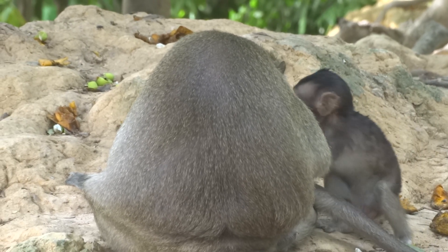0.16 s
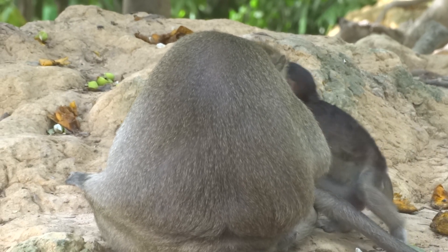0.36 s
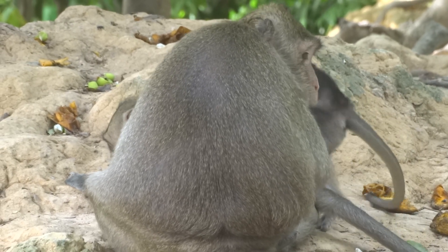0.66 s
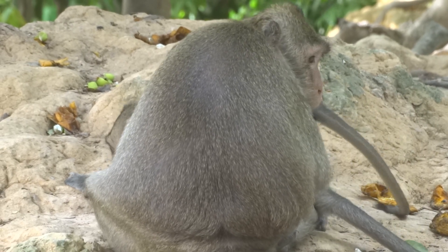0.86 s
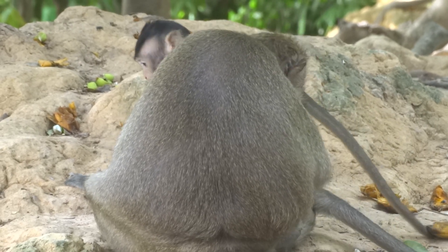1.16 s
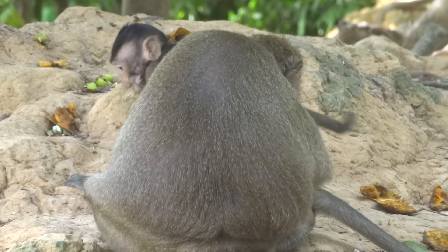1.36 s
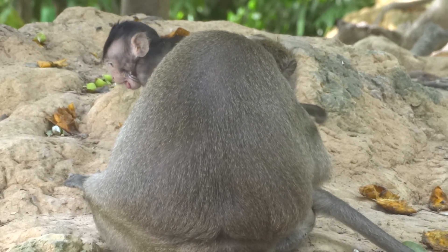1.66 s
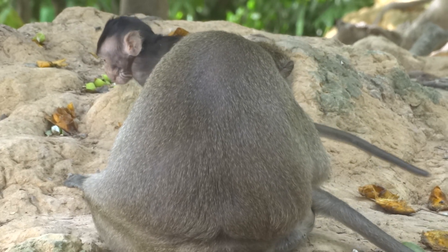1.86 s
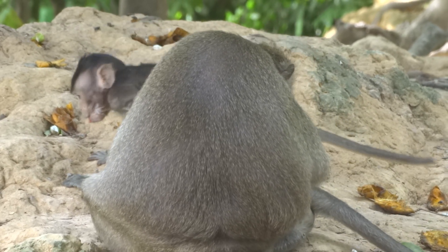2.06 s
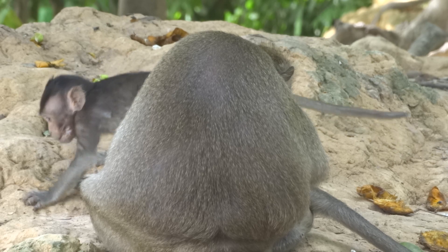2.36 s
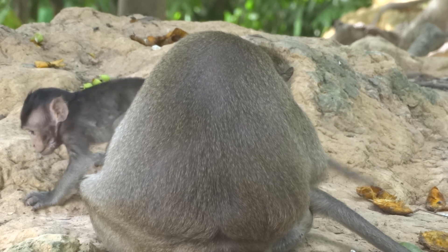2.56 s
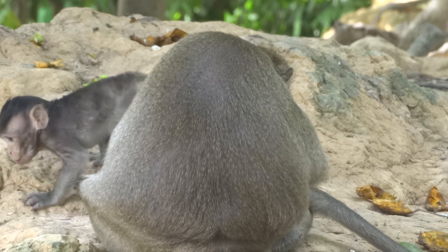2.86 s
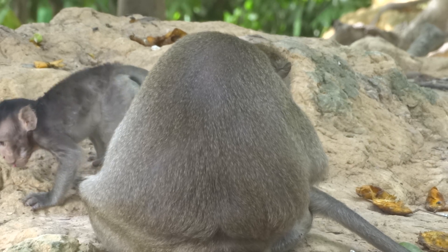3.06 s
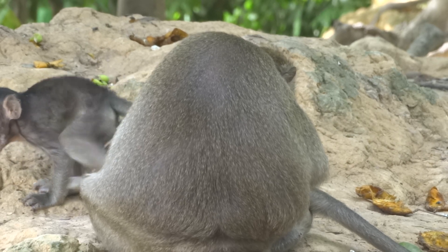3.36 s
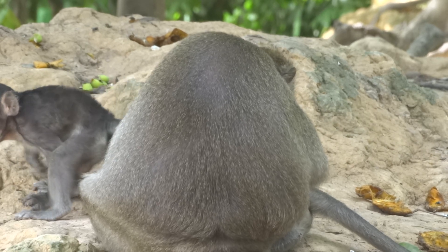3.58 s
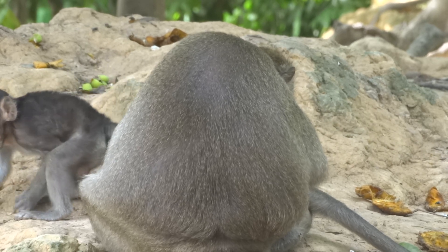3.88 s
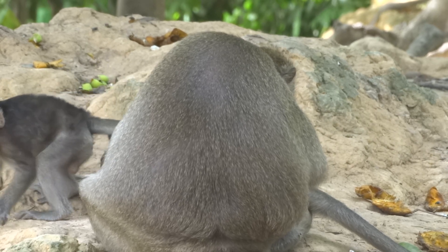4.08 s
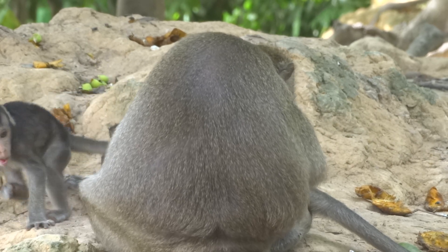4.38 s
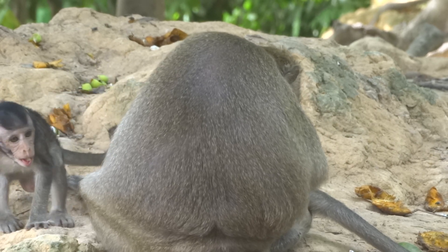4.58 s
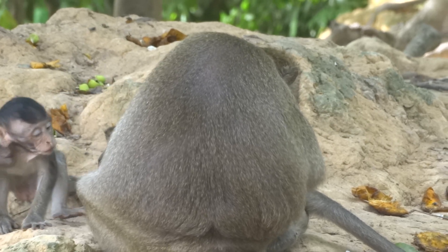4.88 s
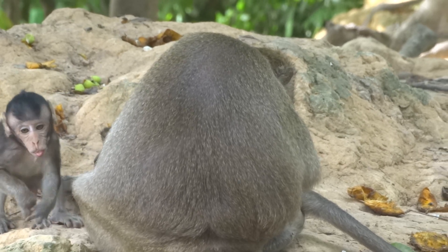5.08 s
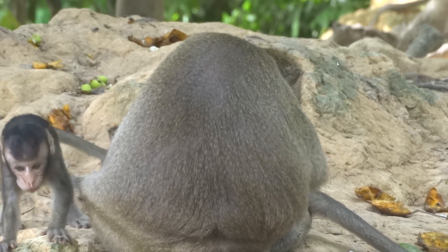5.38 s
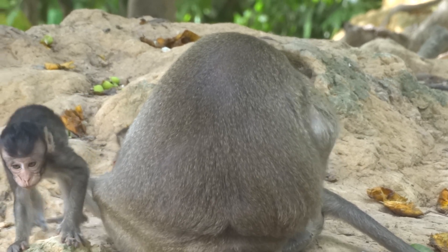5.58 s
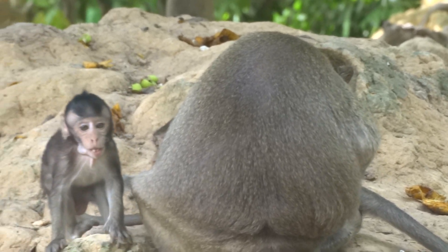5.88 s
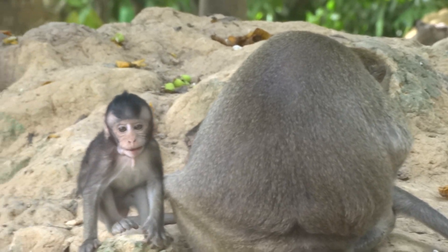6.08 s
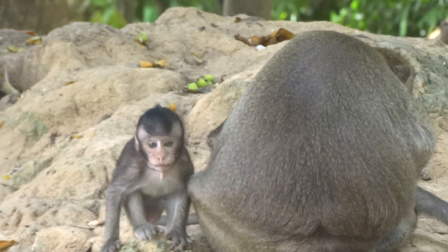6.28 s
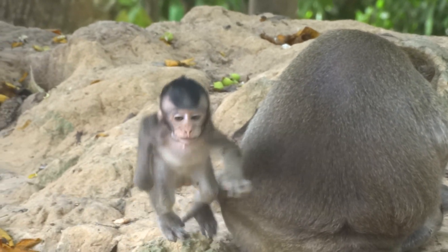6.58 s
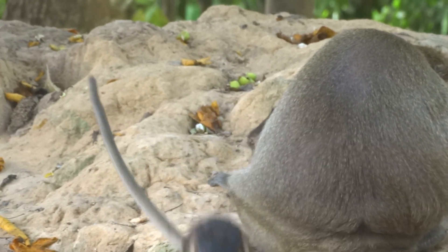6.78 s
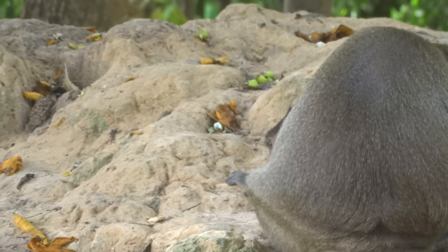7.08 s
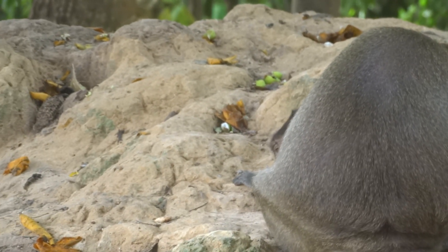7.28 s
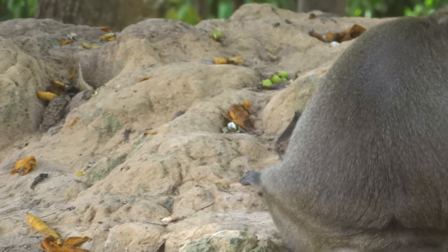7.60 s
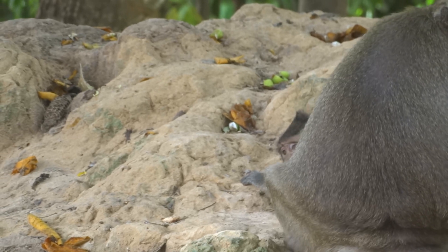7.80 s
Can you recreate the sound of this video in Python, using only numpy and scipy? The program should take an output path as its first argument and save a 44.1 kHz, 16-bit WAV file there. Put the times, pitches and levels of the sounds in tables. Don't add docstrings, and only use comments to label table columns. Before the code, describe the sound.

Outdoors, a clattery rush of three puttering small motorbikes rises from quiet, passes toward the right, dips, then swells loudest near the end.

```python
import sys
import numpy as np
from scipy import signal
from scipy.fft import rfft, irfft, next_fast_len
from scipy.io import wavfile
from scipy.ndimage import uniform_filter1d

SR = 44100
rng = np.random.default_rng(int(sys.argv[2]) if len(sys.argv) > 2 else 0)


def gain_from_db(level_db):
    decades = np.asarray(level_db, float) / 20
    return 10 ** decades


def store_wav(level_fs):
    pcm = np.round(np.clip(np.atleast_2d(level_fs), -1, 1) * 32767)
    wavfile.write(sys.argv[1], SR, pcm.T.astype(np.int16))


N = 350154

# time in seconds, firings per second.
FIRING_RATES = [
    [(0, 23.61), (1, 23.816), (2.5, 24.571), (4.5, 24.515), (5, 25.116), (6, 25.133), (7.94, 26.341)],
    [(0, 18.387), (3, 18.425), (4, 18.819), (6, 18.846), (7.94, 19.711)],
    [(0, 31.93), (4.5, 32.853), (5.5, 33.634), (6, 34.448), (7, 35.275), (7.94, 35.097)],
]
# frequency in Hz, level in dB.
PIPE_RESPONSES = [
    [(20, -70), (49, -23), (74, -22), (98, -12), (147, -2.5), (190, -7), (265, 1.5), (320, -5.5),
     (370, -25), (500, -6.5), (900, -33), (5000, -103)],
    [(15, -87), (56, -37), (75, -14), (94, -4), (150, 0), (188, -8), (245, -7), (300, -7.5), (380, -12),
     (500, -11.5), (900, -36), (5000, -102)],
    [(25, -84), (45, -40), (70, -19), (105, -13), (176, 3.5), (211, 0.5), (245, -3.5), (315, 2), (352, 7.5),
     (390, -8), (420, -8), (600, -11), (1000, -34), (5000, -91)],
]
START_TURNS = [.944, .276, .588]
# arrival in seconds, stay in seconds, level in dB,
# nearing slope in dB per second, leaving slope in dB per second.
EXHAUST_PASSES = [
    (2.55, 0.83, -55.5, 11, 2),
    (4.1, 1.4, -57, 14, 5.5),
    (7.38, .4, -48, 39, 7),
]
# loudest moment
# in seconds, level in dB, frequency in Hz, rise in Hz per second, fade in dB per second squared.
GEAR_WHINES = [(2.87, -55, 378, 9, 60), (3.68, -60, 292, 0, 200), (3.9, -61, 275, 10, 100),
               (6.95, -58, 211, 1, 40), (3.5, -52, 752, 15, 40), (6.42, -53, 1690, 0, 150),
               (7.06, -44, 1705, 150, 600), (7.6, -47, 1370, 600, 900), (7.2, -52, 603, 0, 100),
               (7.45, -51, 545, -80, 400), (7.45, -56, 635, 0, 100), (7.35, -50, 1880, 60, 800),
               (5.28, -46, 835, 0, 9000), (5.425, -42, 830, 0, 20000), (5.69, -48, 1000, 0, 9000),
               (5.75, -51, 1000, 0, 6000), (6.65, -50, 1090, 0, 600), (3.46, -46, 915, 0, 3000),
               (7.125, -36, 1085, 0, 5000), (7.2, -38, 1085, -100, 2500), (7.04, -41, 1075, 60, 1200),
               (7.3, -40, 1070, 200, 5000), (6.93, -43, 1075, -300, 3000), (7.66, -43, 1420, 0, 6000),
               (5.385, -45, 3080, -4000, 60000), (5.18, -48, 1250, 0, 4000), (5.785, -47, 2540, 0, 30000),
               (7.2, -74, 70, 1, 20)]
# middle in seconds, half length in seconds,
# frequency in Hz, width in Hz, level in dB.
METAL_MODES = [(.9, .4, 745, 25, -63), (1.6, .25, 750, 25, -55), (2.8, .3, 742, 25, -49),
               (3.72, .2, 790, 100, -45), (.9, .45, 1130, 250, -58), (7.2, .1, 1065, 60, -40),
               (6.95, .05, 1020, 130, -43), (7.42, .07, 1105, 70, -42), (7.655, .028, 1400, 160, -37),
               (7.57, .055, 1380, 220, -38.5), (7.05, .07, 1700, 60, -50), (6.75, .045, 2300, 150, -41),
               (6.45, .12, 1690, 60, -56), (7.6, .1, 4600, 40, -51), (3.28, .12, 1950, 350, -44),
               (7.88, .06, 1650, 90, -46), (4.6, .35, 1250, 80, -49)]
# middle in seconds, half length in seconds, frequency in Hz, dB over the rush.
PANEL_RINGS = [(2.16, 0.14, 1460, 7.5), (2.3, .25, 1100, 3.5), (2.33, 0.17, 2020, 6), (2, .15, 2200, 3),
               (1.65, 0.32, 3300, 2), (2.2, 0.23, 2800, 5), (3.8, 0.14, 2100, 2), (9.7, .12, 730, -5),
               (6.75, .15, 540, -6), (2.26, .12, 890, 2.5), (7.65, 0.11, 1030, 2.5),
               (4.84, 0.13, 2150, 2.5), (3.23, .1, 760, 3), (3.1, 0.25, 400, 4), (1.66, .25, 516, 6),
               (0.33, 0.24, 220, 8), (7.58, 0.067, 1550, -2), (2.31, 0.21, 870, 6.5), (2.81, 0.15, 775, 7),
               (3.15, 0.065, 1270, 7), (3.24, 0.11, 2140, 3), (3.14, 0.21, 1850, 5), (2.6, 0.19, 1400, 3),
               (2.96, 0.43, 2190, 2.5), (9.1, 0.05, 980, 8), (3.68, 0.32, 807, 6.5), (3.7, 0.85, 260, 7),
               (4.7, 0.078, 800, 4), (3.43, 0.12, 1710, 4.5), (4.34, .15, 1900, 4), (4.5, .06, 1000, 0.5),
               (5.15, 0.11, 1210, 4.5), (2.95, .12, 1080, 0.5), (2.22, .15, 830, -4), (5.45, 0.06, 260, 12),
               (4.95, 0.21, 930, 4.5), (7.5, 0.04, 6960, 9), (7.25, 0.074, 8200, 3.5), (7.5, 0.16, 7700, 2),
               (6.1, 0.12, 545, 6), (7.598, 0.14, 4700, 4.5)]
# frequency in Hz, width in Hz, dB over the rush.
BODYWORK_MODES = [(1670, 290, 2.5), (2310, 270, 3.5), (3770, 370, 3), (5720, 250, -2.1), (6220, 370, 2.5)]
# arrival in seconds, stay in seconds, level in dB,
# nearing slope in dB per second, leaving slope in dB per second.
CLATTER_PASSES = [
    (1.4, .3, -49.5, 17, 20),
    (2.2, 0.78, -39.5, 14, 3.5),
    (4.4, 1.2, -44.5, 9.5, 14),
    (7.03, .55, -37.5, 10, 7),
]
# time in seconds, rush level in dB, left over right in dB.
RUSH_PATH = [(0, -55, 1.5), (0.99, -50, 0), (1.79, -43.5, -1.7), (2.21, -37, -2.1), (2.61, -35, -3),
             (3.2, -36.5, -4), (4.2, -38.5, -3.5), (5.15, -38, -3), (6.05, -42, -1.7), (6.7, -36.5, -2),
             (7.12, -33, -2.5), (7.5, -33, -4), (7.8, -35.5, -3.5), (7.94, -34.5, -3.5)]
# frequency in Hz, level in dB per Hz.
RUSH_SPECTRA = [
    [(29, -59), (50, -7), (232, -12), (403, -20.5), (735, 0), (809, -6), (1200, -4.5), (1970, -3.5),
     (4670, -2), (7360, 0.5), (8710, 1.5), (15500, -32)],
    [(29, -63), (50, -47), (140, -17.5), (477, -10), (660, -5.5), (760, -5), (1080, -0.5), (1740, -7.5),
     (2010, -9.5), (3030, -11), (4670, -17), (8300, -12.5), (14400, -36.5), (15500, -34)],
    [(29, -54), (50, -38), (119, -15), (434, -14), (680, -11), (800, -8.5), (1250, -6.5), (4550, -13),
     (6370, -10.5), (8300, -11), (11900, -27), (14400, -32), (15500, -35)],
    [(29, -52), (50, -46), (140, 1.5), (358, -14.5), (513, -0.5), (668, -6.5), (980, -2), (1160, -5.5),
     (2270, -5.5), (4670, -4), (7720, -1.5), (8920, -3), (15500, -28)],
    [(29, -56), (50, -42), (166, -16), (300, -17.5), (444, -15.5), (718, -10.5), (1550, -9), (2330, -10.5),
     (2690, -13.5), (8500, -9), (12000, -25), (15500, -33)],
]
SPECTRUM_TIMES = [.25, 2.6, 4.9, 6.05, 7.4]
# frequency in Hz, likeness from 0 to 1.
LIKENESS = [(25, .9), (60, .99), (130, 1), (400, .98), (900, .97), (1800, .97), (3500, .985), (6000, .985),
            (8400, .975), (9400, .92), (10200, .74), (11000, .64), (12000, .78), (12700, .97)]
# frequency in Hz, share of the left-right difference.
LEAN_SHARE = [(200, .05), (450, .3), (750, 1), (1300, .68), (2100, 1.05), (2900, 1.5), (3700, 1.35),
              (4700, 1.05), (7100, .55), (8400, .12), (9400, .35), (10200, .8), (11000, 1.4), (12000, .5),
              (12700, .05)]
# time in seconds, frequency in Hz, dB over the rush.
FOOT_SCUFFS = [(.055, 6000, 8), (.326, 7500, 5.5), (.461, 4000, 2), (.804, 9000, 4), (1.023, 8000, 5),
               (1.198, 11000, 2), (2.201, 7940, 3.5), (2.846, 8000, 6.5), (3.202, 6950, 4),
               (3.526, 7100, -1), (4.179, 7000, 4), (6.909, 6900, 4.5), (7.123, 1050, 0),
               (7.137, 7600, 4.5), (7.619, 7500, 2.5), (7.738, 8000, 4.5)]
# time in seconds, frequency in Hz, width in Hz, level in dB.
GRIT_KNOCKS = [
    (.459, 1300, 1500, -44),
    (1.02, 8000, 2500, -41),
    (5.379, 3100, 350, -34),
    (5.386, 2850, 400, -35),
    (5.783, 2540, 200, -36),
]
# time in seconds, peak in dB, frequency in Hz.
DRY_SNAPS = [(0.3214, -36, 7120), (0.4484, -41, 7170), (0.4579, -36, 7270), (0.8034, -40, 7290),
             (1.0264, -36, 6890), (1.1964, -37, 7780), (1.3744, -35, 6860), (1.5594, -33, 6500),
             (2.2034, -33, 7700), (2.4014, -24, 6240), (2.5134, -27, 8520), (2.5934, -26, 7940),
             (2.8354, -28, 6600), (2.8414, -27, 8370), (2.8554, -25, 8660), (2.8664, -16, 7920),
             (2.91, -18, 7670), (3.3414, -31, 8300), (3.3634, -27, 6100), (3.5214, -19, 6380),
             (3.8094, -24, 7860), (4.2074, -29, 5300), (4.5014, -19, 5860), (4.9474, -32, 8000),
             (5.0254, -31, 7190), (5.0814, -32, 5070), (5.4844, -32, 8460), (5.8694, -29, 5870),
             (6.9072, -28, 7150), (7.0204, -28, 7100), (7.1327, -23, 7030), (7.2494, -24, 8580),
             (7.3394, -33, 6060), (7.4354, -23, 7480), (7.6104, -24, 7570), (7.6204, -21, 6730),
             (7.7333, -22, 7200), (7.8464, -23, 7140), (7.915, -27, 6780)]
# frequency in Hz, left lead in radians.
PORT_LEAD = [(30, 0), (200, .1), (450, .2), (1100, .26), (1550, .15), (2100, .09), (3000, .04), (5000, 0),
             (8000, -.03), (9400, -.18), (10200, -.32), (10800, 0), (12000, .06), (12700, 0)]
# frequency in Hz, level in dB.
LEFT_PORT_DIP = [(9000, 0), (9600, -.4), (10200, -2), (11200, -2.2), (12000, -1.4), (12700, 0)]

FRAME, HOP, TAPS = 1024, 256, 16384
BODY_HZ, HISS_HZ = 500, 3500
LEAVES_DB = -55.5


def evened(x):
    return x / np.sqrt(np.mean(x ** 2) + 1e-20)


def read(points, hz):
    f, value = np.transpose(points)
    return np.interp(np.log(hz + 1), np.log(f + 1), value)


def bell(x, middle, half):
    return np.exp(-.5 * ((x - middle) / half) ** 2)


def stretch(at, reach):
    first = max(round((at - reach) * SR), 0)
    n = np.arange(first, min(round((at + reach) * SR), N))
    return n, n / SR - at


def passing(t, arrives, stays, db, nearing, leaving):
    return db - nearing * np.maximum(arrives - t, 0) - leaving * np.maximum(t - arrives - stays, 0)


def firing(rates, row, start):
    t = np.arange(N) / SR
    rate = np.interp(t, *np.transpose(rates))
    return start + np.cumsum(rate) / SR, passing(t, *row)


def exhaust(turns, level_db, pipe, uneven_db=2.0):
    cycle = np.floor(turns).astype(int)
    strength = gain_from_db(uneven_db * rng.standard_normal(size=400))
    pulses = np.diff(cycle, prepend=cycle[0]) * strength[cycle]
    log_gain = np.log(gain_from_db(read(pipe, abs(np.fft.fftfreq(TAPS, 1 / SR)))))
    phase = -signal.hilbert(log_gain).imag
    ring = np.fft.ifft(np.exp(log_gain + 1j * phase)).real[:TAPS // 2]
    return evened(signal.oaconvolve(pulses, ring)[:N]) * gain_from_db(level_db)


def whine(at, db, hz, rise, fade, waver_hz=2, wobble_db=1.8):
    n, t = stretch(at, np.sqrt(40 / fade))
    drift = uniform_filter1d(rng.standard_normal(size=(2, len(n))), size=900, axis=1)
    waver, wobble = evened(drift[0]), evened(drift[1])
    turns = np.cumsum(hz + rise * t + waver_hz * waver * hz / 400) / SR
    out = np.zeros(N)
    out[n] = gain_from_db(db - fade * t ** 2 + wobble_db * wobble) * np.sqrt(2) * np.sin(2 * np.pi * turns)
    lean_db = np.array([[-1.2], [1.2]]) * min(hz / 700, 1)
    return out * gain_from_db(lean_db)


def singing(right_db=2.2):
    out = np.zeros(N)
    for at, half, hz, width_hz, db in METAL_MODES:
        n, t = stretch(at, 3.5 * half)
        r = np.exp(-np.pi * width_hz / SR)
        mode = [1, 0, -1, 1, -2 * r * np.cos(2 * np.pi * hz / SR), r * r]
        shake = signal.sosfilt([mode, mode], rng.standard_normal(len(n)))
        out[n] += gain_from_db(db) * bell(t, 0, half) * evened(shake)
    return out * gain_from_db(np.array([[-right_db / 2], [right_db / 2]]))


def panel_lifts(t, hz):
    rings = 0
    for at, half, mid, db in PANEL_RINGS:
        rings = rings + db * bell(t, at, half) * bell(hz, mid, 52 + 0.031 * mid)
    broad = sum(db * bell(hz, mid, width) for mid, width, db in BODYWORK_MODES)
    return rings + broad * bell(t, 3.2, 1.4)


def scuff_lifts(t, hz):
    half_s, spread = 0.0049, 0.51
    return sum(db * bell(t, at, half_s) * bell(hz, mid, spread * mid) for at, mid, db in FOOT_SCUFFS)


def rush_levels(t, hz, high):
    s, near_db, _ = np.transpose(RUSH_PATH)
    clatter_power = sum(gain_from_db(passing(t, *row)) ** 2 for row in CLATTER_PASSES)
    hiss_db = 10 * np.log10(gain_from_db(LEAVES_DB) ** 2 + clatter_power)
    shares = [np.interp(t, SPECTRUM_TIMES, row) for row in np.eye(len(SPECTRUM_TIMES))]
    field_db = sum(read(c, hz) * share for c, share in zip(RUSH_SPECTRA, shares)) + panel_lifts(t, hz)
    power = gain_from_db(field_db) ** 2
    body_power = np.sum(power * (hz > BODY_HZ) * (hz < HISS_HZ), axis=0)
    hiss_power = np.sum(power * (hz > HISS_HZ), axis=0)
    body_gain_db = np.interp(t, s, near_db) - 10 * np.log10(body_power)
    hiss_gain_db = hiss_db - 10 * np.log10(hiss_power)
    return field_db + (1 - high) * body_gain_db + high * hiss_gain_db


def fluctuation(t, shape, high, beats, patchy_db=0.92, flicker_db=0.44, beat_db=0.64, streaky_db=1.0):
    patches = uniform_filter1d(rng.standard_normal(shape), size=8, axis=0)
    patches = evened(uniform_filter1d(patches, size=8, axis=1))
    streaks = uniform_filter1d(rng.standard_normal(shape), size=2, axis=0)
    streaks = evened(uniform_filter1d(streaks, size=24, axis=1))
    flicker = evened(uniform_filter1d(rng.standard_normal(len(t)), size=3))
    beat = np.interp(t * SR, np.arange(N), beats)
    return streaky_db * streaks + patchy_db * patches + high * (flicker_db * flicker + beat_db * beat)


def rush(beats, under_db=-3.0, deep_db=-7):
    hz = np.fft.rfftfreq(FRAME, 1 / SR)[:, None]
    t = np.arange(N // HOP + FRAME // HOP) * HOP / SR
    shape = (len(hz), len(t))
    low = 1 / (1 + (hz / 450) ** 4)
    high = 1 / (1 + (HISS_HZ / (hz + 1)) ** 4)
    field_db = rush_levels(t, hz, high) + low * under_db + scuff_lifts(t, hz)
    field_db += deep_db / (1 + (hz / 230) ** 4)
    field_db += 2.6 * deep_db / (1 + (hz / 70) ** 4)
    field_db += fluctuation(t, shape, high, beats)

    a, b, c, d = rng.standard_normal(size=(4, *shape))
    apart = np.sqrt((1 - np.clip(read(LIKENESS, hz), 0, 1)) / 2)
    mid, side = a + 1j * b, apart * (c + 1j * d)
    s, _, left_db = np.transpose(RUSH_PATH)
    pan_db = np.interp(t, s, left_db)
    side_on_db = .8 * np.clip((pan_db + 2.5) / 1.2, 0, 1)
    lean = gain_from_db(read(LEAN_SHARE, hz) * (pan_db + high * side_on_db) / 2)
    z = np.array([(mid + side) * lean, (mid - side) / lean]) * gain_from_db(field_db)
    plain = signal.istft(mid, nperseg=FRAME, noverlap=FRAME - HOP)[1]
    unit = np.sqrt(np.mean(plain ** 2) / len(hz))
    return signal.istft(z, nperseg=FRAME, noverlap=FRAME - HOP)[1][:, :N] / unit


def grit():
    t, out = np.arange(2000) / SR, np.zeros(N)
    envelope = np.minimum(t / 0.00091, 1) * np.exp(-t / 0.0042)
    for at, hz, width_hz, db in GRIT_KNOCKS:
        edges = [hz - width_hz / 2, hz + width_hz / 2]
        band = signal.butter(2, edges, "bandpass", fs=SR, output="sos")
        burst = evened(signal.sosfilt(band, rng.standard_normal(len(t)))) * envelope
        out[round(at * SR):][:len(t)] += gain_from_db(db) * burst
    return out


def snaps():
    t, out = np.arange(-64, 64) / SR, np.zeros(N)
    for (at, db, hz), turn in zip(DRY_SNAPS, rng.random(len(DRY_SNAPS))):
        click = gain_from_db(db - 3.5) * bell(t, 0, .00007) * np.cos(2 * np.pi * (hz * t + turn))
        out[round(at * SR) - len(t) // 3:][:len(t)] += click
    return out


def scene():
    engines = [firing(*bike) for bike in zip(FIRING_RATES, EXHAUST_PASSES, START_TURNS)]
    thumps = sum(exhaust(turns, db, pipe) for (turns, db), pipe in zip(engines, PIPE_RESPONSES))
    loudest = np.sqrt(sum(gain_from_db(db) ** 2 for turns, db in engines))
    beats = sum(gain_from_db(db) * np.cos(2 * np.pi * turns) for turns, db in engines) / loudest
    whines = sum(whine(*row) for row in GEAR_WHINES)
    return thumps + whines + singing() + rush(beats) + grit() + snaps()


def roll_off(x):
    return signal.sosfilt(signal.butter(12, 15780, fs=SR, output="sos"), x)


def record(dry):
    size = next_fast_len(N)
    hz = np.fft.rfftfreq(size, 1 / SR)
    turn = np.exp(.5j * read(PORT_LEAD, hz))
    responses = np.array([turn * gain_from_db(read(LEFT_PORT_DIP, hz)), 1 / turn])
    ports = irfft(rfft(dry, size) * responses, size)[:, :N]
    return roll_off(ports)


dry = scene()
out = record(dry)
store_wav(out)
```